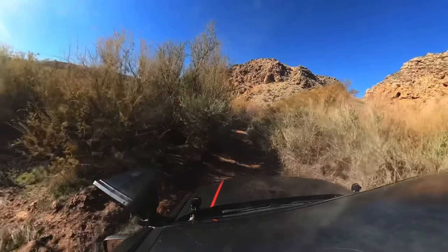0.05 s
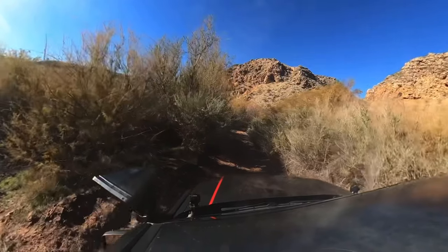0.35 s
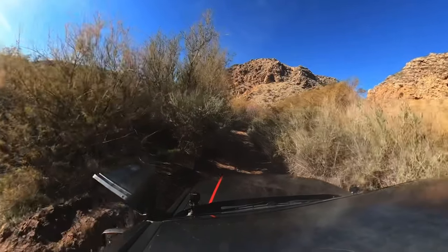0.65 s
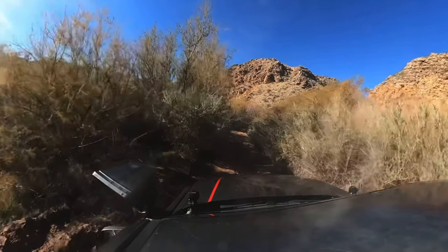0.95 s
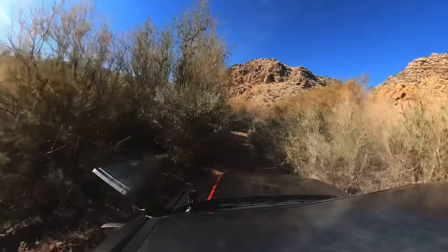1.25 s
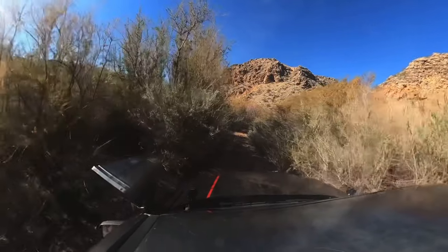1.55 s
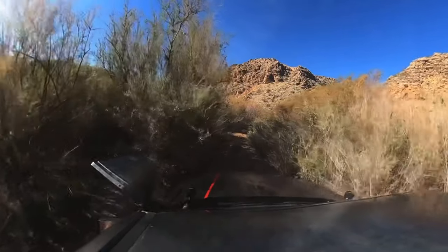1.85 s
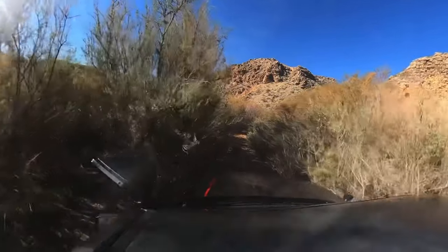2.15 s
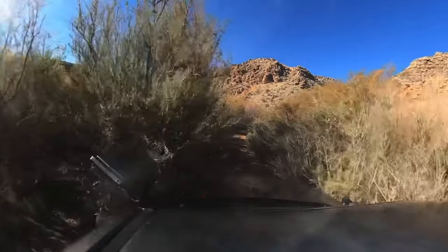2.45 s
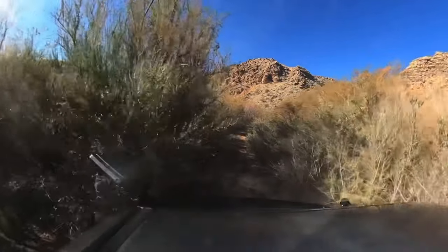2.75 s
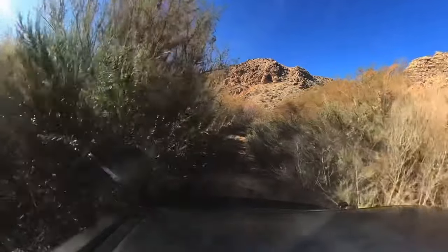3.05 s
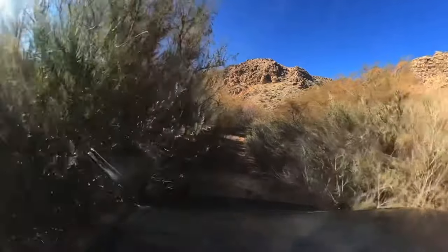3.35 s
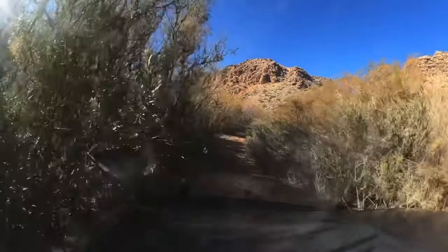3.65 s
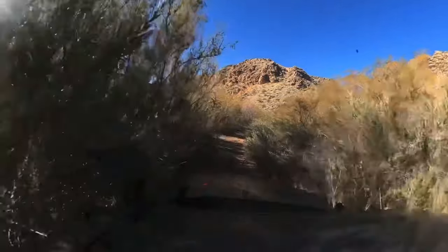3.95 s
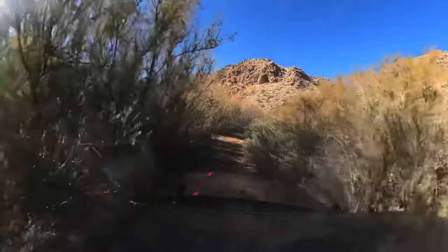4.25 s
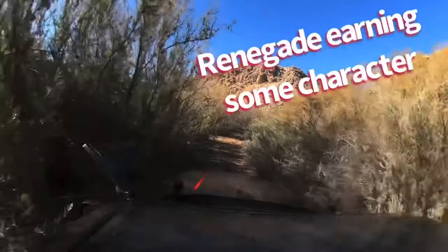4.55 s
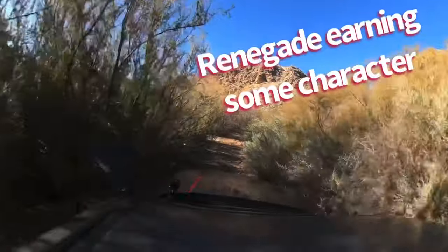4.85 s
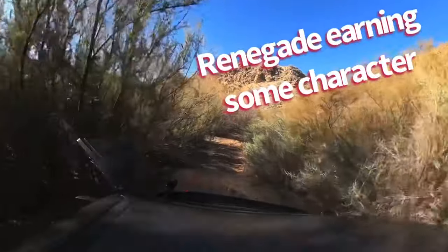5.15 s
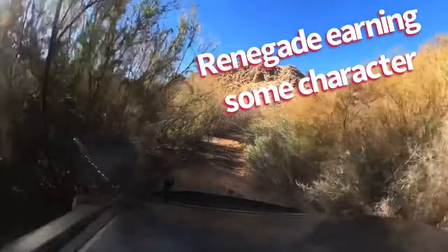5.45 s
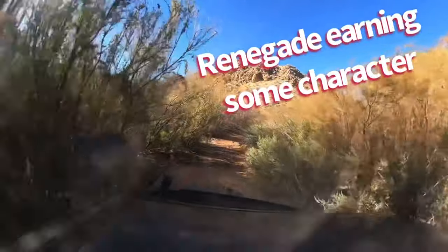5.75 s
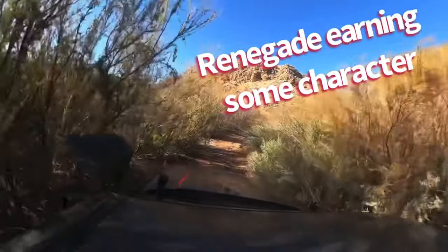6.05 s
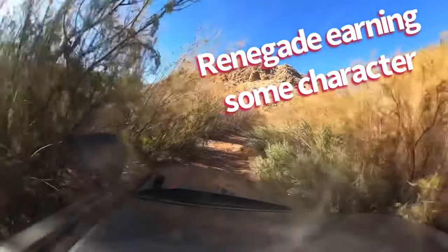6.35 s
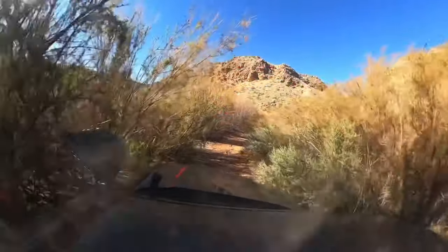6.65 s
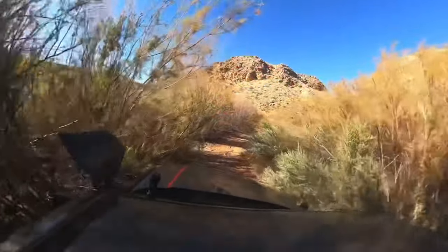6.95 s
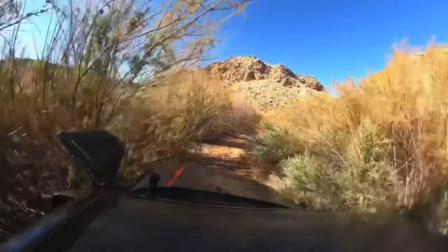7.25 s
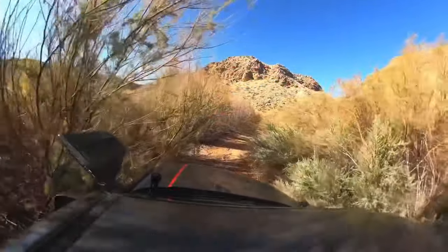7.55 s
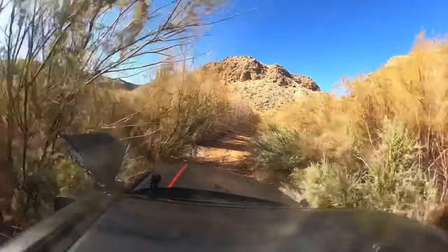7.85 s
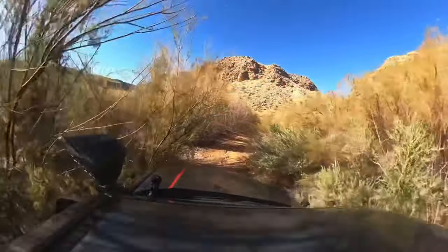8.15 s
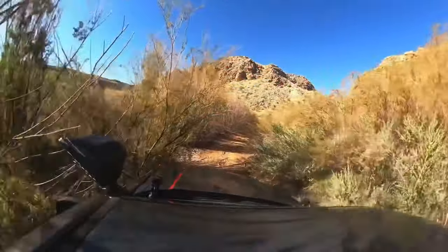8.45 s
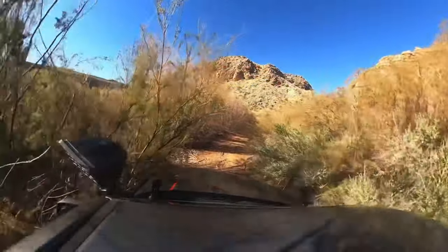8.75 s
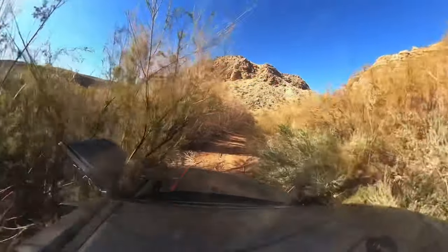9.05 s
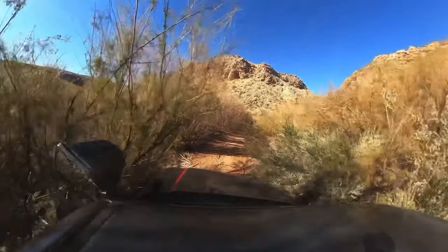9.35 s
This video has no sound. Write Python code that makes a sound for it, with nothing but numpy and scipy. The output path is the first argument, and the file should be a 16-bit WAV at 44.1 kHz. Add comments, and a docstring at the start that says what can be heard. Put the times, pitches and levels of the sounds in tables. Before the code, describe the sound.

A truck engine drones from inside the cab while dry brush swishes, scratches, squeaks and snaps along the body and branches knock the panels.

```python
"""A truck creeps along an overgrown dirt trail, heard from inside the cab.
At first the eight-cylinder engine drones and lopes over tyre rumble, and leafy tips whisk past.
From about 2 s dry brush drags along the body: leaves swish, twigs scratch, snap and squeak on the
paint, branches judder and knock on the panels. After 6 s the engine slows a little and the rumble
fades; the thickest brush comes at 7-8 s, and knocks and snaps go on to the end."""
import sys
import numpy as np
from scipy import signal
from scipy.io import wavfile
from scipy.ndimage import uniform_filter1d

SR = 44100
rng = np.random.default_rng(int(sys.argv[2]) if len(sys.argv) > 2 else 0)


def store_pcm(level_fs):
    """Save levels as 16-bit WAV."""
    pcm = np.round(np.clip(level_fs, -1, 1) * 32767).astype(np.int16)
    wavfile.write(sys.argv[1], SR, np.atleast_2d(pcm).T)


N = 414099
TIME = np.arange(N) / SR


def amp(db):
    """Decibels to gain."""
    return 10 ** (np.asarray(db) / 20)


def unit(x):
    """Scales to rms 1."""
    return x / np.sqrt(np.mean(x ** 2) + 1e-20)


def at_peak(x, db, size=176):
    """Scales the loudest 4 ms to an rms level of db."""
    return amp(db) * x / np.sqrt(uniform_filter1d(x ** 2, size).max())


def curves(rows):
    """Columns of a time table, interpolated per sample."""
    time_s, *columns = np.transpose(rows)
    return [np.interp(TIME, time_s, column) for column in columns]


def add(mix, start_s, sound):
    """Mixes a sound in at start_s."""
    part = mix[max(round(start_s * SR), 0):][:len(sound)]
    part += sound[:len(part)]


def colour(x, spectrum, size=4096):
    """Minimum-phase filter with the given spectrum."""
    hz, db = np.transpose(spectrum)
    bins_hz = abs(np.fft.fftfreq(size, 1 / SR))
    log_gain = np.log(amp(np.interp(np.log(bins_hz + 1), np.log(hz), db)))
    taps = np.fft.ifft(np.exp(np.conj(signal.hilbert(log_gain)))).real
    return signal.oaconvolve(x, taps[:size // 2])[:len(x)]


def ring(x, hz, *widths_hz):
    """Unity-gain resonances at hz in series, one per width."""
    hz = min(hz, SR / 3)
    for width_hz in widths_hz:
        x = signal.lfilter(*signal.iirpeak(hz, hz / min(width_hz, SR / 4), fs=SR), x)
    return x


def resonate(x, hz, width_hz):
    """Gliding resonance: shift hz down to zero, smooth, shift back."""
    carrier = np.exp(2j * np.pi * np.cumsum(hz * np.ones(len(x))) / SR)
    pole = np.exp(-np.pi * width_hz / SR)
    smoothed = signal.lfilter([1 - pole], [1, -pole], x * carrier.conj() + 1e-18)
    return 2 * (carrier * smoothed).real


def wander(per_s, size=N):
    """Random drift, rms 1, with per_s knots a second."""
    knots = rng.standard_normal(2 ** 14)
    return unit(np.interp(TIME[:size] * per_s, np.arange(len(knots)), knots))


def clicks(per_s, spread_db):
    """Sparse slips of random size and sign."""
    size = amp(spread_db * np.minimum(rng.exponential(1, N), 4.5))
    return size * rng.choice([-1, 1], N) * (rng.random(N) < per_s / SR)


def crackle(decay_s, grain_db, rise_s):
    """A burst of slips that builds quickly and dies away."""
    t = TIME[:SR // 4]
    slips, sizes = rng.standard_normal((2, len(t)))
    envelope = np.exp(-t / max(decay_s, 1e-3)) * (1 - np.exp(-t / rise_s))
    return slips * amp(grain_db * sizes) * envelope


def cab(x, wet, t60_s=0.083):
    """The small cab adds a dense, short tail."""
    t = TIME[:SR // 5]
    tail = rng.standard_normal(len(t)) * amp(-60 * t / t60_s)
    tail *= wet / np.linalg.norm(tail)
    tail[0] = 1
    return signal.oaconvolve(x, tail)[:len(x)]


def drivetrain(level_db=-71, pitch_hz=1325, width_hz=140):
    """The gears whine faintly in a narrow band of noise."""
    return amp(level_db) * unit(ring(rng.standard_normal(N), pitch_hz, width_hz, width_hz))


# Hiss spectrum: freq_hz, gain_db
HISS_SPECTRUM = [(120, -7.5), (235, -5.5), (390, -20), (550, -20), (880, -25.5), (1080, -21), (1550, -23),
                 (2200, -29.5), (6000, -37), (8200, -43.5), (10000, -56.5), (15000, -74)]

def cab_hiss(level_db=-56.5):
    """A soft, slightly flickering hiss fills the cab."""
    air = rng.standard_normal(N) * amp(wander(40))
    return amp(level_db) * unit(colour(air, HISS_SPECTRUM))


# Continuous boom, before trim_db: time_s, level_db
BOOM_LEVELS = [(0, -59), (3.7, -51.5), (4.15, -39), (6.4, -61.5), (9.39, -44.5)]
# Trail bumps: start_s, peak_db
TRAIL_BUMPS = [(1.18, -39.5), (2.14, -42), (2.569, -36), (3.209, -44), (4.411, -43), (7.66, -37.5)]

def cab_boom(trim_db=-2, pitch_hz=177, width_hz=26, jolt_s=0.032):
    """The shaken cab booms at one air resonance, most on bumps."""
    shake = ring(rng.standard_normal(N), pitch_hz, width_hz, width_hz)
    out = amp(curves(BOOM_LEVELS)[0] + trim_db) * unit(shake)
    for start_s, peak_db in TRAIL_BUMPS:
        jolt = crackle(jolt_s, grain_db=4.5, rise_s=jolt_s)
        add(out, start_s, at_peak(ring(jolt, pitch_hz, width_hz, width_hz), peak_db))
    return out


# Rumble spectrum: freq_hz, gain_db
TYRE_SPECTRUM = [(12, -5.5), (24, 6.5), (42, 7.5), (66, 12), (90, -9), (150, -6), (260, -18.5),
                 (1500, -100)]
# Rumble level: time_s, level_db
TYRE_LEVELS = [(0, -39.5), (2, -38), (6.2, -34.5), (7.2, -42), (9.39, -57)]

def tyres():
    """Tyres on dirt shake the cab with a low rumble."""
    rumble = colour(rng.standard_normal(N), TYRE_SPECTRUM, size=16384)
    return amp(curves(TYRE_LEVELS)[0]) * unit(rumble)


# Engine speed and firing tone: time_s, crank_hz, firing_db
ENGINE_RUN = [(0, 19.1, -32.5), (1.15, 19.05, -32), (2, 19.3, -33.5), (6.1, 19.45, -37), (7.3, 18.6, -31.5),
              (9.39, 18.25, -31.5)]
# Crank orders, relative to firing_db (order 4) or lope_db (the rest): order, gain_db
CRANK_ORDERS = [(1, -7), (2, -14), (3, -12.5), (3.33, -15.5), (3.67, -15.5), (4, 3), (5, -20), (6, -12),
                (7, -24.5), (8, -25), (12, -30.5)]

def engine(lope_db=-31, firing_waver=0.025, lope_waver=0.12):
    """Four firings a turn make the drone; unequal cylinders add the other orders."""
    crank_hz, firing_db = curves(ENGINE_RUN)
    turns = np.cumsum(crank_hz) / SR
    out = np.zeros(N)
    for order, gain_db in CRANK_ORDERS:
        order = round(3 * order) / 3  # orders at thirds make the drone throb
        if order == 4:
            strength = amp(firing_db) * (1 + firing_waver * wander(24))
        else:
            strength = amp(lope_db) * (1 + lope_waver * wander(14))
        out += amp(gain_db) * strength * np.cos(2 * np.pi * (order * turns + rng.random()))
    return out


# Leafy tips: start_s, peak_db, centre_hz, decay_s
LEAF_FLICKS = [(0.286, -61.5, 7300, 0.032), (1.146, -68, 6060, .015), (1.82, -62.5, 6550, 0.038),
               (2.198, -62, 8800, 0.025), (5.986, -54.5, 6060, 0.028), (6.235, -69, 11500, .022),
               (9.076, -49, 5750, 0.015)]

def flicks(q=2.2, flutter_db=2):
    """A leafy tip whisks past: a bright, fluttering hiss that swells and trails off."""
    out = np.zeros(N)
    for start_s, peak_db, hz, decay_s in LEAF_FLICKS:
        hiss = crackle(decay_s, grain_db=-2.5, rise_s=decay_s)
        hiss *= amp(flutter_db * wander(110, size=len(hiss)))
        add(out, start_s, at_peak(ring(hiss, hz, hz / q, hz / q), peak_db))
    return out


# Bent stems: start_s, peak_db, resonance_hz, decay_s
STEM_CREAKS = [(2.573, -54, 2060, 0.013), (2.899, -43, 1100, 0.018), (3.705, -48, 1520, 0.015),
               (4.081, -37.5, 2400, 0.01), (4.912, -56, 2040, 0.019), (5.62, -50, 1543, 0.018)]

def creaks(slips_per_s=160, unevenness=0.2, slip_share=0.35, damping_hz=7000):
    """A bent stem slips in uneven jerks that ring the wood; thin, high stems are damped most."""
    out = np.zeros(N)
    for start_s, peak_db, hz, decay_s in STEM_CREAKS:
        run = crackle(decay_s, grain_db=1.5, rise_s=decay_s)
        slip_hz = slips_per_s * np.exp(unevenness * wander(slips_per_s, size=len(run)))
        cycle = np.cumsum(slip_hz) / SR % 1
        width_hz = hz ** 2 / damping_hz
        wood = ring(run * np.exp(-cycle / slip_share), hz, width_hz, 2 * width_hz)
        add(out, start_s, at_peak(cab(wood, wet=0.5), peak_db))
    return out


# Thin tips squeaking, thick wood groaning: start_s, length_s, start_hz, end_hz, level_db, rasp_share
STEM_SQUEAKS = [(4.005, 0.084, 516, 492, -49, 0.16), (4.95, 0.066, 503, 502, -48, 0),
                (5.335, 0.025, 5430, 5200, -54, 0.1), (5.7, 0.38, 2950, 2900, -63.5, 0.4),
                (6.054, 0.1, 7450, 8500, -50, 0.2), (6.1, 0.065, 8800, 9400, -61, 0.35),
                (6.13, 0.095, 10350, 10700, -66.5, 0.2), (6.14, 0.09, 13850, 13400, -72, 0.25),
                (7.636, 0.1, 7000, 6180, -54, 0.03), (9.32, 0.075, 4600, 4300, -60.5, 0.2),
                (9.144, 0.035, 442, 430, -41, 0)]

def squeaks(jitter=0.013, waver=0.007, stutter_db=5, rasp_width=0.16, octave_db=-36):
    """Stick-slip on paint: regular slips sing a wavering, stuttering note, irregular ones rasp."""
    out = np.zeros(N)
    unsteady = 1 + jitter * wander(900) + waver * wander(45)
    stutter = amp(stutter_db * np.minimum(wander(90), 1))
    slips = rng.standard_normal(N)
    for start_s, length_s, start_hz, end_hz, level_db, rasp_share in STEM_SQUEAKS:
        progress = (TIME - start_s) / length_s
        on = (progress > 0) & (progress < 1)
        hz = (start_hz + (end_hz - start_hz) * progress[on]) * unsteady[on]
        phase = 2 * np.pi * np.cumsum(hz) / SR
        octave = amp(octave_db) * (2 * hz < SR / 2) * np.sin(2 * phase)
        tone = unit(np.sin(phase) + octave)
        width_hz = rasp_width * start_hz
        rasp = unit(resonate(resonate(slips[on], hz, width_hz), hz, 2 * width_hz))
        note = np.sqrt(1 - rasp_share) * tone + np.sqrt(rasp_share) * rasp
        out[on] += amp(level_db) * unit(stutter[on] * note) * signal.windows.tukey(len(hz), 0.4)
    return cab(out, wet=0.52)


# Cab wall response: freq_hz, gain_db
WALL_SPECTRUM = [(300, 31), (1200, 5), (8000, 2), (9400, -3.5), (11500, -14), (15000, -22.5)]

def through_wall(x):
    """The cab wall dulls sounds from outside."""
    return colour(x, WALL_SPECTRUM)


# Snapping twigs: start_s, peak_db, centre_hz
TWIG_SNAPS = [(1.327, -59, 2400), (2.0288, -48.5, 1710), (2.3692, -51, 2430), (2.769, -45.5, 3600),
              (3.514, -47.5, 2750), (3.579, -38, 3370), (3.982, -41, 1750), (5.728, -54.5, 4440),
              (5.816, -47, 2500), (5.984, -48, 5200), (6.503, -47.5, 7970), (6.777, -52, 1530),
              (6.987, -43, 5600), (7.102, -41, 4200), (7.114, -27, 5070), (7.131, -31.5, 4200),
              (7.172, -28.5, 4970), (7.259, -42, 7800), (7.288, -43, 1530), (7.2991, -33.5, 2100),
              (7.374, -43.5, 5600), (7.4076, -38.5, 7000), (7.5123, -28.5, 6300), (7.6332, -38, 1810),
              (7.8834, -37.5, 2020), (8.526, -47.5, 4160), (8.7158, -40, 3420), (8.8195, -39.5, 1670),
              (8.8857, -37.5, 5050), (8.9491, -40, 2170), (9.142, -41.5, 1550), (9.194, -40, 2030),
              (9.255, -38, 1840), (9.2699, -33, 1460), (9.307, -40, 1290)]

def snaps(q=0.83):
    """Dry twigs break or whip the body; thicker ones sound lower and crackle longer."""
    out = np.zeros(N)
    for start_s, peak_db, hz in TWIG_SNAPS:
        slips = crackle(0.003 * (5000 / hz) ** 0.25, grain_db=5, rise_s=0.001)
        crack = ring(slips, hz, hz / q, 2 * hz)
        inside = cab(through_wall(crack), wet=0.55, t60_s=0.14)
        add(out, start_s, at_peak(inside, peak_db))
    return out


# Body panel modes: pitch_hz, width_hz, gain_db
PANEL_MODES = [(276, 46, -8), (364, 25, -1), (427.7, 45, 2.5), (526, 72, 1), (654, 49, -10.5),
               (768, 47, -9.5), (1044, 60, -10), (1170, 840, -18.5)]
# Tone of a branch on a panel: freq_hz, gain_db
BRANCH_SPECTRUM = [(150, -41), (290, 5), (450, -1), (1600, 2), (3000, 5), (12000, -84)]

def panel(push, direct_db=-21):
    """A branch rings the sheet metal; the spot touched sets which modes ring most."""
    out = amp(direct_db) * push
    for hz, width_hz, gain_db in PANEL_MODES:
        coupling = amp(2.5 * wander(6, size=len(push)))
        out += amp(gain_db) * ring(push * coupling, hz, width_hz)
    return colour(out, BRANCH_SPECTRUM)


# Branch strikes: start_s, peak_db, centre_hz, judder_s
BRANCH_KNOCKS = [(1.326, -50.5, 310, 0.011), (1.738, -51.5, 279, 0.033), (2.74, -31, 404, 0.0029),
                 (2.955, -41, 355, 0.013), (3.187, -38, 430, 0.023), (3.61, -42, 715, 0.014),
                 (4.09, -40, 385, 0.028), (6.425, -48, 320, 0.013), (7.29, -45, 350, 0.064),
                 (7.429, -39, 398, 0.013), (7.456, -34, 396, 0.0058), (7.6615, -26.5, 478, 0.018),
                 (7.687, -30, 390, 0.0051), (7.883, -33.5, 393, 0.014), (8.432, -44.5, 362, 0.0041),
                 (8.818, -39.5, 420, 0.0035), (8.886, -37.5, 520, 0.027), (8.948, -41, 574, 0.033),
                 (9.03, -50, 430, 0.011), (9.256, -40, 520, 0.09)]

def knocks(q=1.6, typical_judder_s=0.016, clack_db=-21, clack_hz=1500, strike=0.55):
    """Branches spring back on the panels: a strike, then a judder; metal booms, wood clacks."""
    out = np.zeros(N)
    lowest_mode_hz = PANEL_MODES[0][0]
    for start_s, peak_db, hz, judder_s in BRANCH_KNOCKS:
        blow = crackle(judder_s, grain_db=5, rise_s=0.0012)
        blow[0] += strike * np.linalg.norm(blow)
        width_hz = hz / q * np.clip(judder_s / typical_judder_s, 0.5, 2) ** 2  # short blows ring hollow
        thud = unit(cab(panel(ring(blow, hz, width_hz)), wet=0.64, t60_s=0.15))
        clack = unit(ring(blow, clack_hz, clack_hz, 2 * clack_hz))
        clack_gain = amp(clack_db) * hz / lowest_mode_hz
        add(out, start_s, at_peak(thud + clack_gain * clack, peak_db))
    return out


def touch(start_s, length_s, attack_s, release_s, ease_db_per_s=0.5):
    """One contact presses in, eases off while it slides, and lets go."""
    t = np.maximum(TIME - start_s, 0)
    press = np.minimum(t / attack_s, 1)
    release = np.exp(-np.minimum(np.maximum(t - length_s, 0) / release_s, 20))
    return press * release * amp(-ease_db_per_s * t)


# Passing bushes: start_s, length_s, leaf_db, twig_db, branch_db
BUSH_CONTACTS = [(1.76, 0.99, -68, -65, -65.5), (2.475, 0.78, -65.5, -51, -47),
                 (3.317, 0.62, -63, -54, -53.5), (3.893, 0.55, -60.5, -51.5, -50),
                 (4.5, 0.93, -62.5, -61.5, -61.5), (5.28, 0.8, -68, -56.5, -61),
                 (6.366, 1.1, -62, -58.5, -67), (6.824, 0.46, -50.5, -55.5, -57),
                 (7.305, 0.77, -58, -48.5, -48.5), (8.562, 0.56, -60, -53, -48.5)]
# Single stems: start_s, length_s, level_db, thickness (0 leaf, 0.5 twig, 1 branch)
STEM_CONTACTS = [(2.54, 0.075, -52.5, 0.4), (2.755, 0.12, -47, 0.73), (2.875, 0.14, -54, 1),
                 (3.136, 0.17, -49.5, 0.83), (3.506, 0.027, -42, 0.67), (4.906, 0.078, -44.5, 0.88),
                 (5.1, 0.13, -50, 0.93), (5.493, 0.054, -56.5, 0.24), (7.431, 0.083, -37.5, 0.83),
                 (7.615, 0.08, -39.5, 1), (7.818, 0.17, -45, 1), (8.002, 0.45, -48.5, 0.39),
                 (8.134, 0.022, -45, 0.28), (8.452, 0.13, -48.5, 0.68)]

def pressure(db_per_thickness=26.5):
    """How hard leaves, twigs and branches rub on the body; contacts add in power."""
    power = np.zeros((3, N))
    for start_s, length_s, *levels_db in BUSH_CONTACTS:
        contact = touch(start_s, length_s, attack_s=0.29, release_s=0.4)
        power += np.outer(amp(levels_db), contact) ** 2
    for start_s, length_s, level_db, thickness in STEM_CONTACTS:
        share = amp(-db_per_thickness * abs(thickness - np.array([0, 0.5, 1])))
        contact = touch(start_s, length_s, attack_s=0.0061, release_s=0.029)
        power += np.outer(amp(level_db) * share / np.linalg.norm(share), contact) ** 2
    return np.sqrt(power)


def stems(low_hz, high_hz, per_s, spread_db, grip_db, q, count, bend=0.14):
    """Several stems rub at once; each grips in its own time and shifts pitch as it bends."""
    out = np.zeros(N)
    for hz in np.geomspace(low_hz, high_hz, count):
        slips = clicks(per_s, spread_db) * amp(grip_db * wander(26))
        rub = resonate(slips, hz * np.exp(bend * wander(9)), hz / q)
        front, rear = (cab(rub, wet=1.0, t60_s=0.091) - rub for _ in range(2))
        place = wander(2)  # the path through the cab changes as the stem slides
        out += unit(rub + np.cos(place) * front + np.sin(place) * rear) * np.sqrt(hz)
    return out


def branches(press, tug_db=0.9):
    """Thick stems judder along the panels and make them drum."""
    rubs = stems(261, 1434, per_s=220, spread_db=-0.5, grip_db=4.0, q=3.8, count=6)
    return press * unit(panel(rubs * amp(tug_db * wander(24))))


# Twig scratch: freq_hz, gain_db
TWIG_SPECTRUM = [(300, -26), (800, -8.5), (1400, -7), (2800, -8.5), (4200, -13), (7500, -17), (15000, -78)]
# Leaf swish: freq_hz, gain_db
LEAF_SPECTRUM = [(1500, 5), (3800, 2), (5500, 6), (8200, 4), (9300, -3.5), (11500, -12.5), (15000, -25.5)]

def brush(leaf_press, twig_press, twig_gain_db=-1, tick_gain_db=-5):
    """Twigs scratch, leaves swish and dry tips tick on the paint, each as hard as it is pressed."""
    tug = amp(wander(30))  # a bush catches and lets go as a whole
    twigs = stems(900, 5500, per_s=230, spread_db=3.9, grip_db=2.9, q=3.2, count=8, bend=0.22)
    leaves = stems(3540, 11100, per_s=900, spread_db=3.2, grip_db=2.5, q=2.3, count=5)
    tips = cab(clicks(per_s=38, spread_db=3), wet=0.9, t60_s=0.04)
    scratch = twig_press * amp(twig_gain_db) * unit(colour(twigs, TWIG_SPECTRUM))
    swish = leaf_press * unit(colour(leaves, LEAF_SPECTRUM))
    ticks = np.sqrt(leaf_press * twig_press) * amp(tick_gain_db) * unit(through_wall(tips))
    return tug * (scratch + swish + ticks)


def scene():
    """All sources at one point in the cab, mono."""
    leaf_press, twig_press, branch_press = pressure()
    rubbing = branches(branch_press) + brush(leaf_press, twig_press)
    truck = engine() + tyres() + cab_boom() + cab_hiss() + drivetrain()
    return (truck + rubbing + snaps() + knocks() + squeaks() + creaks() + flicks())[None]


def record(dry):
    """A steep low-pass removes the highest treble."""
    cutoff_hz = 15600
    taps = signal.firwin(511, cutoff_hz, window=("kaiser", 9), fs=SR)
    return signal.oaconvolve(dry, taps[None], "same")


dry = scene()
out = record(dry)
store_pcm(out)
```